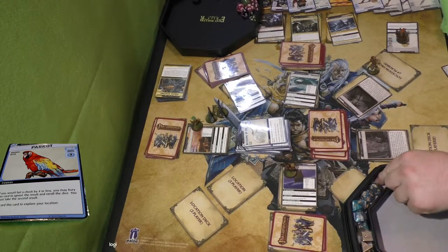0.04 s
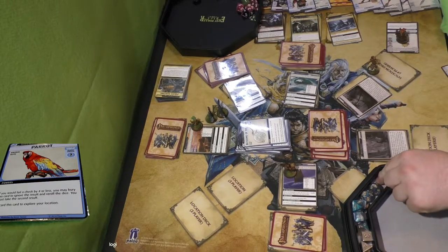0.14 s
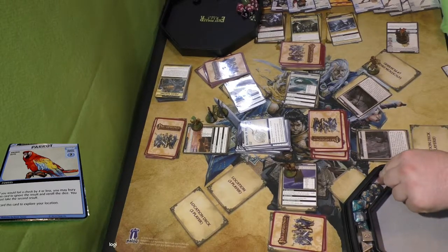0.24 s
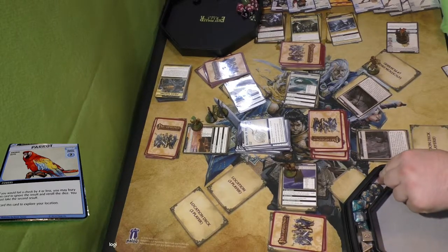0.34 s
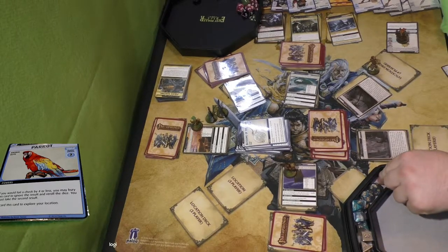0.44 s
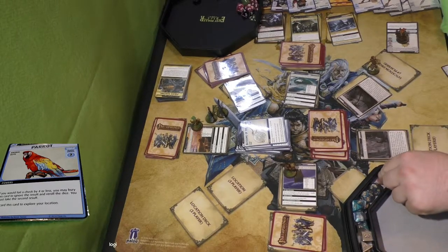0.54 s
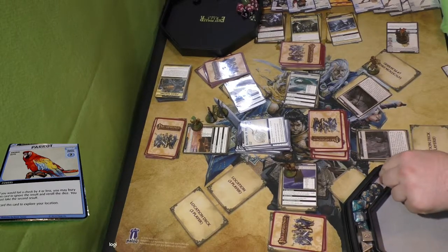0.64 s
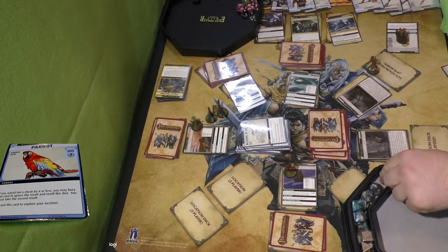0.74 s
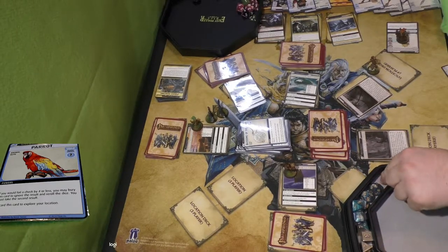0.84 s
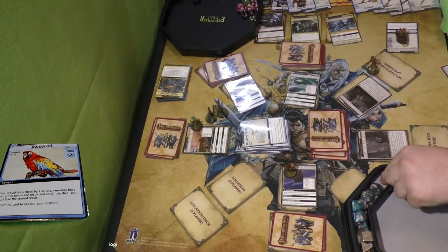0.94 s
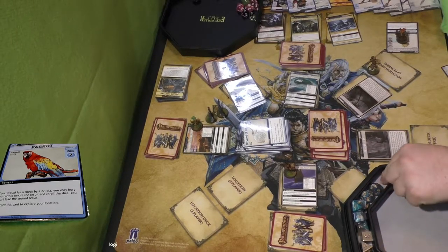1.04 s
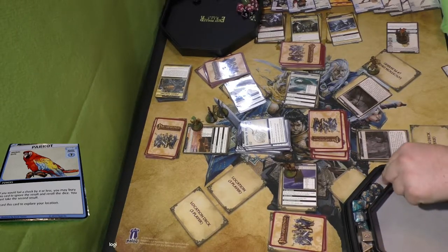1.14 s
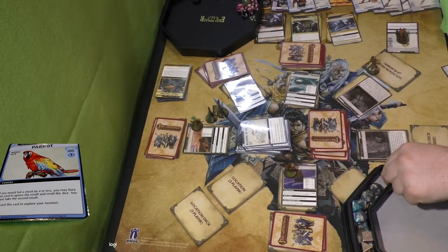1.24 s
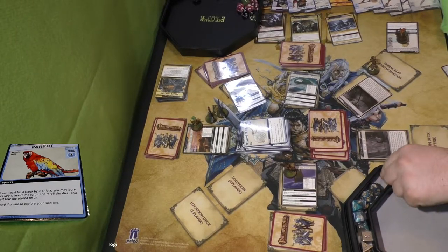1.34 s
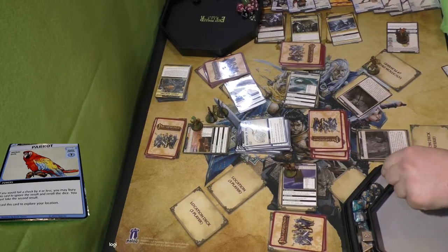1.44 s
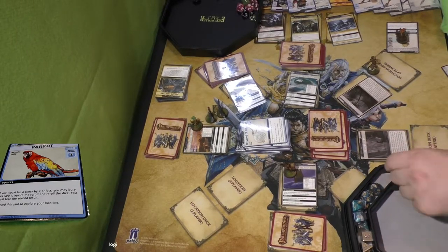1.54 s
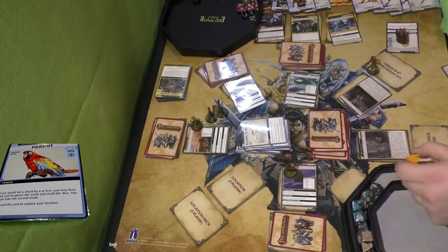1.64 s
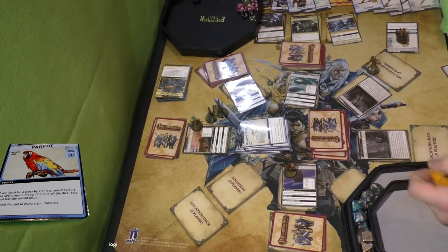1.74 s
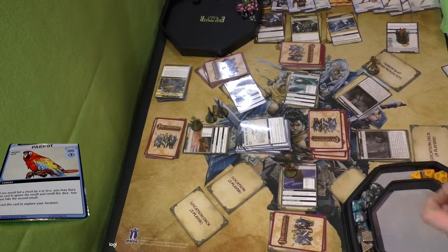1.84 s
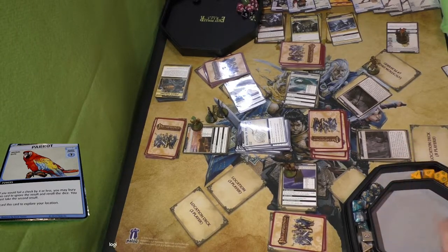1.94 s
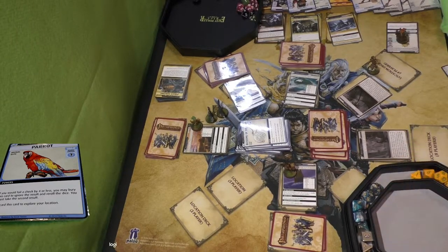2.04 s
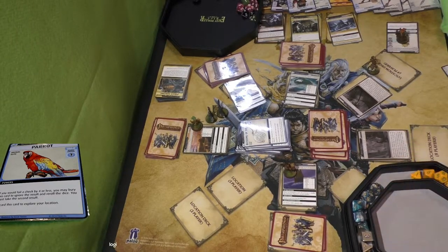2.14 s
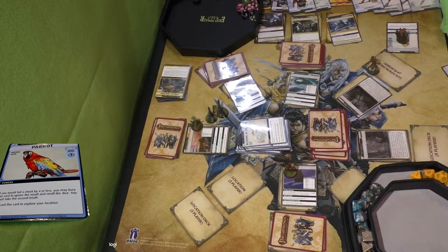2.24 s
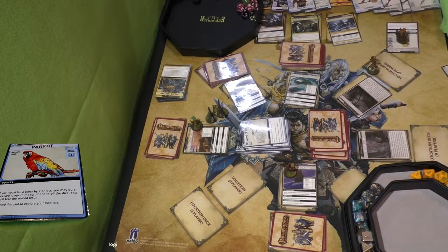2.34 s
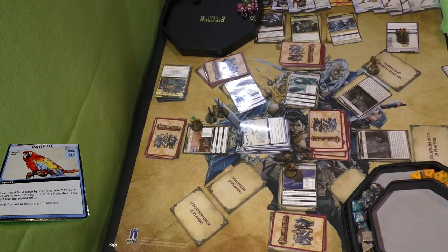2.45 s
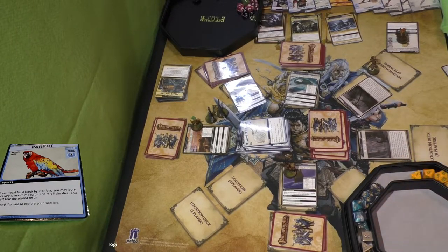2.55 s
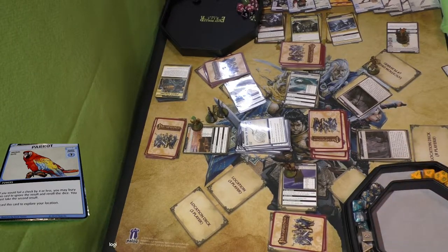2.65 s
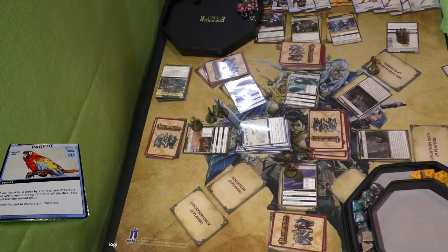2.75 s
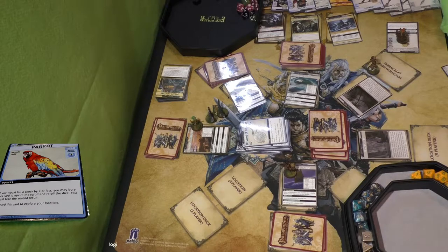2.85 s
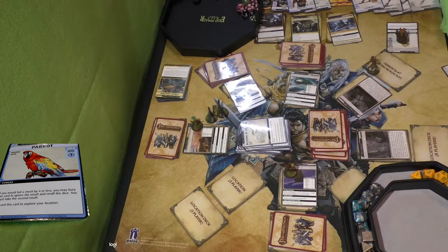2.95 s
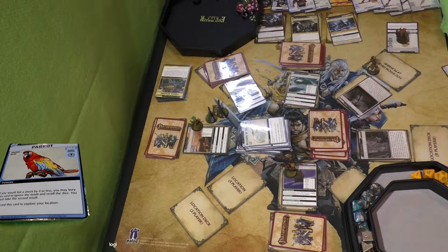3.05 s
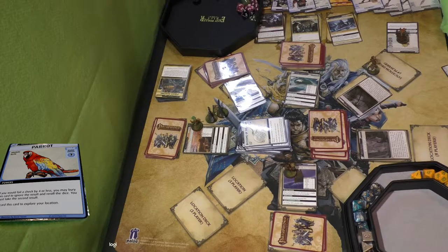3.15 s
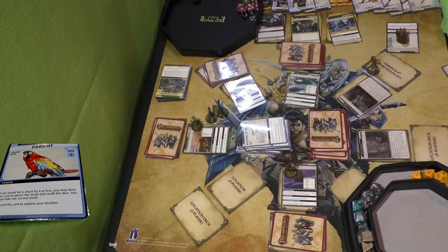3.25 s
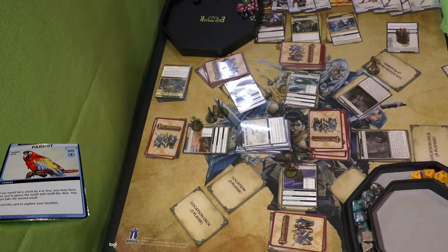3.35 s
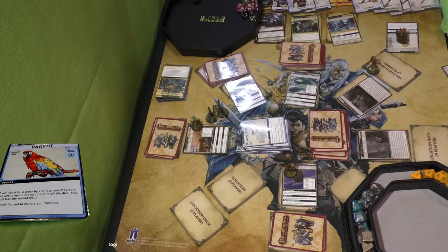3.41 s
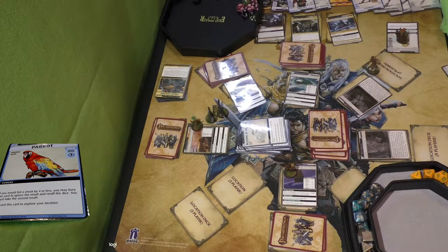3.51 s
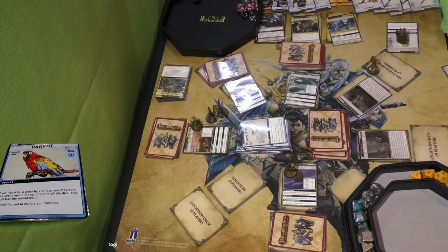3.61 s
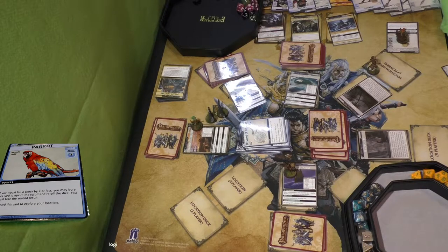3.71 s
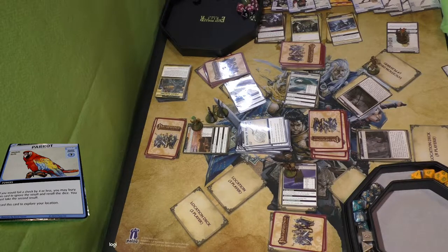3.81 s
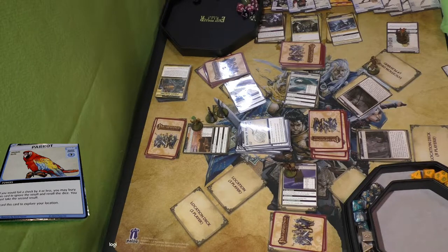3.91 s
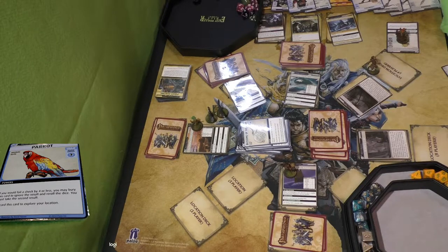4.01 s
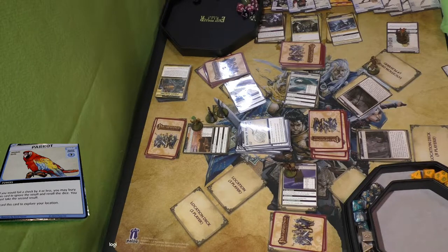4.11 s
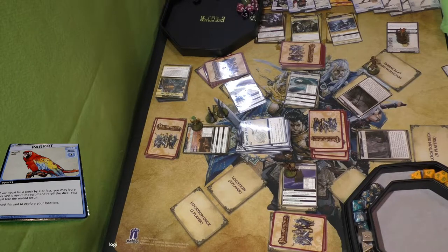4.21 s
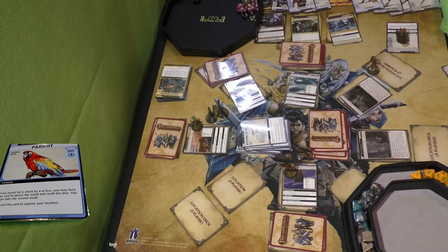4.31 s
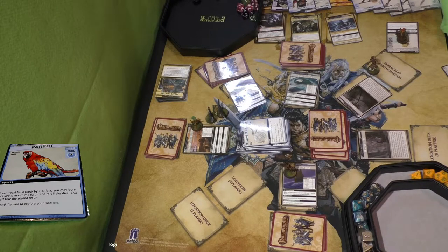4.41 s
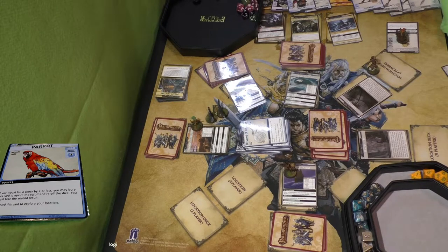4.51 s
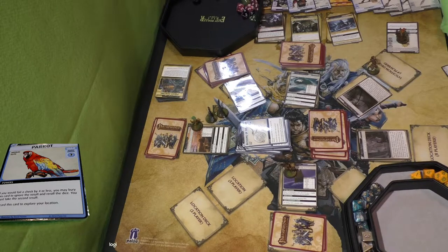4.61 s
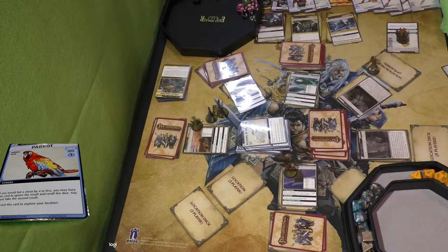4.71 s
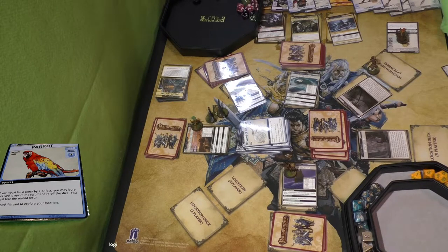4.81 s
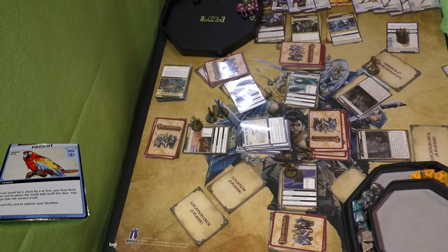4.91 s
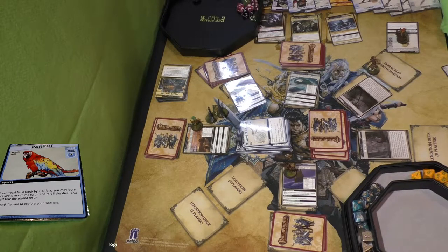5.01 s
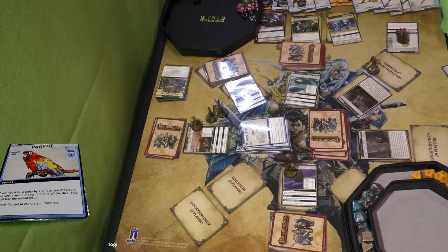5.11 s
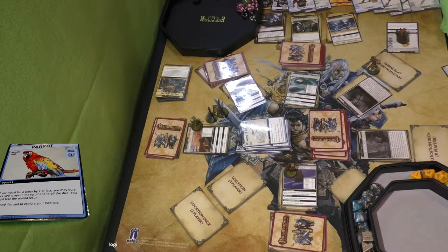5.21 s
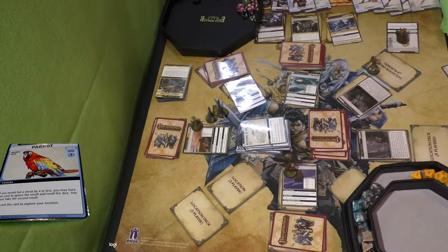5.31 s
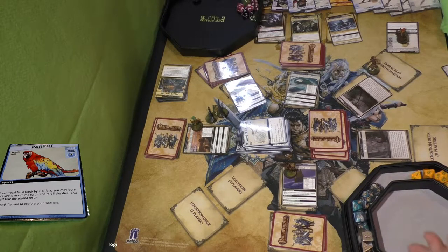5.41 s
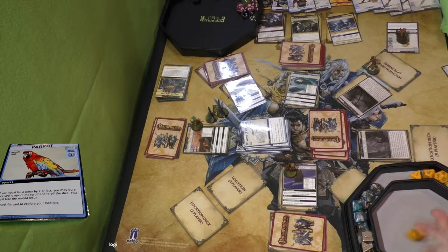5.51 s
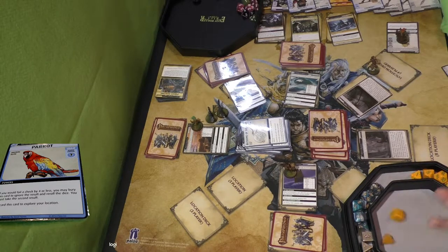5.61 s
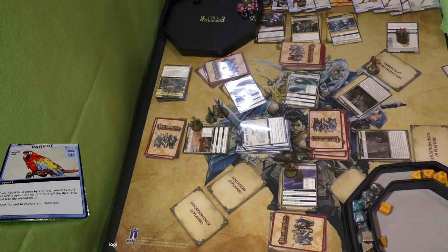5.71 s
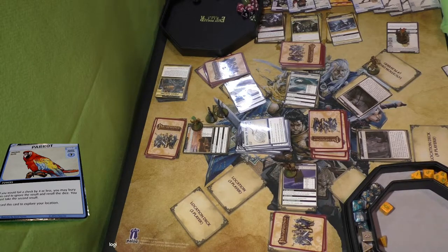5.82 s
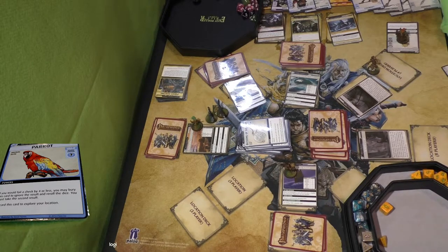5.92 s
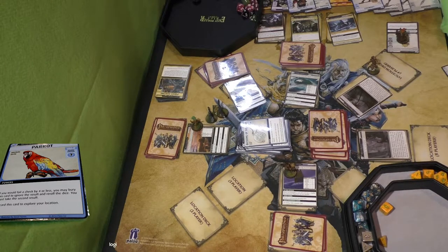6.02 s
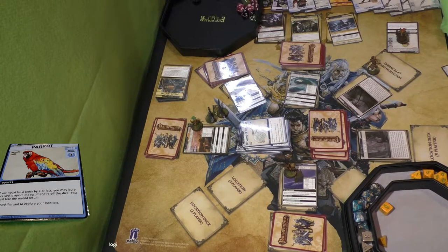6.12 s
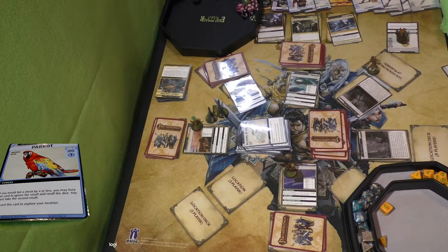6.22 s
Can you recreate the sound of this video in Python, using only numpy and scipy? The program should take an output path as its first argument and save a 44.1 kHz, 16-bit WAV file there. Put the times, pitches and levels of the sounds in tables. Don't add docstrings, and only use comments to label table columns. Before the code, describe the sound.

Close above a table in a small room, with faint mains hum, fingers scrape quietly and nudge plastic dice in their slot. A couple of crisp clacks follow as dice are lifted, then sparse clicks, then about two seconds of dense, bright rattling between cupped hands. It loosens into a few clicks, palms rub apart, and the dice land with a hard padded knock, a brief tumble and soft roll.

```python
import sys
import numpy as np
from scipy import signal
from scipy.io import wavfile
from scipy.ndimage import uniform_filter1d, minimum_filter1d

SR = 44100
rng = np.random.default_rng(int(sys.argv[2]) if len(sys.argv) > 2 else 0)


def boost_factor(decibels):
    exponent = np.asarray(decibels, float) / 20
    return 10 ** exponent


def wav_out(sig):
    wavfile.write(sys.argv[1], SR, np.round(np.clip(np.atleast_2d(sig).T, -1, 1) * 32767).astype(np.int16))


N = 276110

# (time [s], blow level [dB], hardness [dB], floor pitch [Hz])
KNOCKS = [(5.6150, -2.5, 6, 785), (5.6245, -17.5, -11, 1560), (5.6282, -8, -4, 873), (5.6356, -15, -2, 934),
          (5.6782, -22, -21, 900), (5.6972, -20, -9, 920), (5.711, -25, -21, 834), (5.732, -22.5, -34, 927),
          (5.7876, -17, 3, 890), (5.721, -30.5, -17, 1130), (5.752, -26.5, -18, 960),
          (5.7984, -37, -6, 980), (5.685, -25, -15, 900), (5.744, -30, -10, 990), (5.76, -33.5, -18, 925),
          (5.804, -31, -6, 940), (5.812, -35, -12, 950)]


def evened(x):
    return x / np.sqrt(np.mean(x ** 2) + 1e-20)


def read(points, hz):
    f, value = np.transpose(points)
    return np.interp(np.log(hz + 1), np.log(f + 1), value)


def curve(rows):
    s, db = np.transpose(rows)
    return np.interp(np.arange(N) / SR, s, db, left=-200, right=-200)


def add(mix, s, sound):
    part = mix[round(s * SR):][:len(sound)]
    part += sound[:len(part)]


def burst(hz, db, ring_s, turn):
    u = np.arange(900) / SR / ring_s
    swell = (u * np.exp(1 - u)) ** 2
    return boost_factor(db) * swell * np.sin(2 * np.pi * (hz * ring_s * u + turn))


def noise(tone, patchy_db, size=512):
    frames, hz = 4 * N // size + 5, np.fft.rfftfreq(size, 1 / SR)
    a, b, patches = rng.standard_normal((frames, len(hz), 3)).T
    patches = uniform_filter1d(patches, size=8, axis=0)
    patches = evened(uniform_filter1d(patches, size=12, axis=1))
    z = (a + 1j * b) * boost_factor(read(tone, hz)[:, None] + patchy_db * patches)
    return evened(signal.istft(z, nperseg=size, noverlap=3 * size // 4)[1][:N])


def riding():
    # (time [s], level [dB], recovery time [s])
    sags = [
        (1.851, 0, 0.16),
        (3.2, -2.5, .5),
        (4.1, -1.5, 1.),
    ]
    t = np.arange(N) / SR
    gain_db = -1.08 - 0.18 * t
    gain_db += -8 * np.exp(-(t / 0.18) ** 0.69)
    for s, db, back_s in sags:
        step = np.clip((t - s) / .04, 0, 1)
        gain_db += db * step * np.exp(-np.maximum(t - s, 0) / back_s)
    landed = np.maximum(t - KNOCKS[0][0], 0)
    for db, hump_s in [(-15.5, 0.045), (4, 0.12)]:
        u = landed / hump_s
        gain_db += db * u ** 2 * np.exp(1 - u ** 2)
    return gain_db


def hum():
    # (multiple of the mains, level [dB rms])
    overtones = [(1, -47.5), (2, -72), (3, -60.5), (4, -83), (5, -75), (7, -77.5), (9, -80.5), (11, -85),
                 (13, -86), (15, -84.5), (17, -96.5), (19, -96), (21, -89.5), (23, -93.5)]
    # (frequency [Hz], level [dB])
    hiss_tone = [(25, 10), (40, -7.5), (100, -4.5), (150, -5), (300, -9), (600, -19), (1200, -23),
                 (2500, -32), (4000, -39), (8000, -42), (16000, -47)]
    mains_hz, hiss_db = 60.0, -61.5
    turn = 2 * np.pi * mains_hz * np.arange(N) / SR
    tones = np.zeros(N)
    for k, db in overtones:
        tones += np.sqrt(2) * boost_factor(db) * np.cos(k * turn + .75 * max(k - 3, 0))
    return (tones + boost_factor(hiss_db) * noise(hiss_tone, 1.2, size=2048)) * boost_factor(riding())


def earlier_knock():
    # (frequency [Hz], level [dB], time to fall 60 dB [s])
    fading = [(800, -68, 0.16), (1080, -66, 0.14), (1400, -77, 0.17), (2360, -54.5, 0.086),
              (4120, -88, 0.12)]
    out, t = np.zeros(N), np.arange(9000) / SR
    for hz, db, t60 in fading:
        band = signal.butter(2, [.9 * hz, 1.1 * hz], "band", fs=SR, output="sos")
        settled = signal.sosfilt(band, rng.standard_normal(2 * len(t)))[len(t):]
        add(out, 0, boost_factor(db - 60 * t / t60) * evened(settled))
    return out


def hand():
    # (time [s], level [dB])
    scrape = [(0.35, -106), (0.436, -83), (0.926, -88), (0.934, -72), (1.096, -102), (1.264, -83),
              (1.424, -92), (1.512, -77.5), (1.83, -82)]
    scoop = [(2.12, -76.5), (2.314, -78), (2.338, -93), (2.376, -81), (2.464, -81), (2.48, -82)]
    reach = [
        (6.2, -100),
        (6.24, -92.5),
        (6.27, -58),
    ]
    # (time [s], level [dB])
    nail = [(.4, -100), (.48, -87), (.56, -96), (.68, -88), (.85, -104), (.95, -74), (1.03, -100)]
    squeak = [(1.42, -105), (1.568, -80), (1.652, -91), (1.684, -77), (1.7, -84), (1.742, -72), (1.83, -76)]
    # (time [s], level [dB])
    sleeve = [(2.4, -90.5), (2.8, -76.5), (4.1, -68), (4.6, -72), (5.07, -68), (5.11, -55.5), (5.2, -68),
              (5.35, -58.5), (5.6, -67)]
    chatter = [(3.68, -78), (3.75, -53), (3.95, -55.5), (4.12, -59.5), (4.22, -57.5), (4.3, -83)]
    # (time [s], level [dB])
    rub = [(5.15, -86.5), (5.27, -64.5), (5.34, -86.5), (5.45, -51), (5.6, -42), (5.625, -50.5), (5.7, -78),
           (5.82, -67)]
    # (frequency [Hz], level [dB per Hz])
    scrape_tone = [(2000, -4), (3000, 9), (4200, -14), (5900, -7), (8000, -29), (12300, -11), (15000, -9)]
    nail_tone = [(10500, -17), (12400, 7), (13800, -20), (15500, 1), (16500, -17)]
    squeak_tone = [(3800, -5), (4300, -11.5), (5300, -28), (5900, 0), (6400, -15.5), (7500, -21),
                   (9000, -37)]
    sleeve_tone = [(200, -18), (500, -3), (1000, 2.5), (1600, 4.5), (2200, -7.5), (4000, -52)]
    chatter_tone = [(1600, -18.5), (2400, -1), (3200, -6), (4200, -13), (5200, -12.5), (9000, -24)]
    rub_tone = [(1500, -15.5), (2470, -6.5), (2950, -6), (3500, -17), (4580, -24), (5870, -26), (7500, -13),
                (9890, -14.5), (13000, -15), (16000, -23)]
    layers = [(scrape, scrape_tone, 1.5), (nail, nail_tone, 3), (squeak, squeak_tone, 2.5),
              (scoop, scrape_tone, 3), (sleeve, sleeve_tone, 2.5), (chatter, chatter_tone, 3),
              (rub, rub_tone, 1.5), (reach, scrape_tone, 1.5)]
    return sum(noise(tone, patchy_db) * boost_factor(curve(level)) for level, tone, patchy_db in layers)


def fingers(x):
    # (start time [s], frequency [Hz], width [Hz], share taken [0-1])
    gaps = [(0, 3590, 500, 0), (2.4, 4770, 1094, 0.7), (2.65, 4970, 1100, 0.63), (2.77, 4670, 1120, 1),
            (3.19, 4250, 600, 0.55), (3.31, 3730, 800, 0.52), (3.42, 3670, 1090, 0.75),
            (3.71, 4400, 510, 0.24), (3.92, 3520, 500, 0.55), (4.24, 3520, 500, 0.5),
            (4.39, 3550, 1350, 0.96), (4.52, 3370, 1200, 0.9), (4.77, 5150, 600, 0.17),
            (4.855, 4780, 1400, 1), (5.2, 4630, 603, 0.33)]
    out, t = x.copy(), np.arange(N) / SR
    ends = [row[0] for row in gaps[1:]] + [N / SR]
    for (s, hz, width_hz, share), until in zip(gaps, ends):
        held = (t >= s) & (t < until)
        r = np.exp(-np.pi * width_hz / SR)
        turn = np.exp(2j * np.pi * hz * t[held])
        band = turn * signal.lfilter([1 - r], [1, -r], x[held] / turn)
        out[held] -= np.clip(share, 0, 1) * 2 * band.real
    return out


def dice():
    # (time [s], level [dB], frequency [Hz])
    nudges = [
        (0.405, -74, 2600),
        (0.937, -52, 3040),
        (0.944, -70, 3120),
        (1.18, -69, 3000),
        (1.252, -58, 3040),
        (1.52, -60.5, 3170),
    ]
    # (time [s], main ring [dB], main
    # ring [Hz], upper ring [dB], edge rings [dB])
    dice_hits = [(1.8466, -17.5, 5260, -10.5, -11.5), (1.8564, -16.5, 4890, -7, -11),
                 (1.866, -32, 5600, -38, -25), (1.867, -24, 5560, -36, -39), (1.9504, -40, 5300, -59, -46.5),
                 (1.955, -31, 5650, -22.5, -29), (2.4949, -30.5, 6880, -32, -66),
                 (2.506, -20.5, 6840, -23.5, -68), (2.5118, -25, 6600, -29, -66),
                 (2.5153, -25, 6800, -38, -62), (2.5298, -27, 6200, -35, -67), (2.5608, -35, 6300, -48, -76),
                 (2.6262, -27.5, 6900, -47, -53), (2.6298, -29, 7000, -49, -71),
                 (2.6572, -24.5, 7440, -18, -17.5), (2.6789, -30, 7300, -16.5, -21),
                 (2.686, -44, 7040, -29, -37), (2.694, -57, 6920, -49, -46), (2.7782, -25, 6400, -16, -30),
                 (2.7816, -27, 6530, -18, -47), (2.7854, -24.5, 6260, -36, -46),
                 (2.8375, -31, 6370, -35.5, -65), (2.9483, -29, 7400, -22.5, -33),
                 (2.9651, -11.5, 6430, -7, -15.5),
                 (3.2027, -6, 5680, -8, -6), (3.21, -17.5, 7100, -21, -20), (3.2558, -15.5, 6300, -28, -30),
               (3.307, -41, 6240, -57, -55), (3.3197, -11.5, 5360, -17, -16.5),
               (3.325, -20, 5200, -15.5, -23), (3.333, -27, 5600, -23, -31), (3.3453, -30, 5900, -29, -33),
               (3.3573, -17, 5740, -18.5, -23), (3.3644, -21, 6400, -23, -25),
               (3.4243, -23.5, 6070, -28, -23), (3.4316, -14.5, 5540, -32, -13.5),
               (3.436, -10, 5240, -10, -16), (3.4405, -19, 5200, -29, -17), (3.455, -22, 5860, -26, -27),
               (3.4582, -26, 5200, -31, -27), (3.5078, -32, 5350, -39, -52), (3.5104, -24, 5440, -35, -48),
               (3.5124, -31, 5320, -51, -77), (3.5244, -20.5, 5520, -21, -32),
               (3.5271, -16, 5680, -29, -26), (3.607, -12.5, 5420, -26, -37), (3.615, -37, 5600, -24, -48),
               (3.618, -18, 5650, -30, -42),
                 (3.7234, -11.5, 6155, -26.5, -9.5), (3.7327, -36, 6630, -32, -31),
              (3.7907, -13, 5920, -19, -18.5), (3.8231, -18, 5480, -22.5, -24),
              (3.8324, -35.5, 6590, -30, -28), (3.8681, -13.5, 6080, -11.5, -14.5),
              (3.8713, -17, 6100, -20.5, -25.5), (3.9332, -22.5, 5650, -36.5, -48.5),
              (3.9433, -20.5, 5340, -27, -48.5), (3.9507, -28.5, 5310, -43, -43.5),
              (3.9621, -28.5, 5520, -45, -57.5), (3.9892, -16, 6110, -19, -7.5),
              (3.9956, -30, 7430, -16.5, -30), (3.9983, -35.5, 6880, -21, -22.5),
              (4.0009, -34, 6670, -21.5, -33), (4.0061, -38.5, 7124, -25, -24.5),
              (4.0244, -20.5, 6200, -7.5, -10.5), (4.0324, -19, 4550, -13, -26.5),
              (4.0413, -25, 5140, -22, -30.5), (4.0477, -44, 5670, -31.5, -32),
                 (4.09, -6.5, 5910, -12, -5), (4.0957, -22, 5800, -30, -25), (4.1072, -46, 5270, -29, -31),
              (4.124, -24, 5500, -30, -34), (4.1394, -15.5, 5550, -30, -44), (4.1504, -41, 6160, -33, -36),
              (4.17, -9.5, 6450, -31, -18), (4.241, -49, 5290, -52, -44), (4.2493, -5, 5520, -16, -22.5),
              (4.26, -32, 5760, -36, -41), (4.268, -25, 5800, -40, -56), (4.275, -28, 5800, -49, -49),
              (4.2897, -14, 6100, -27, -17), (4.3085, -11.5, 6130, -33, -17),
              (4.312, -21, 6300, -25.5, -16.5), (4.402, -11, 5600, -41, -19.5),
              (4.4124, -5, 5670, -16.5, -13), (4.428, -42, 5460, -41, -21), (4.4489, -10, 5800, -19, -8.5),
              (4.4549, -12, 6300, -15, -19), (4.4644, -27, 6180, -22, -32), (4.4726, -37, 6140, -36, -39.5),
                 (4.529, -15.5, 5630, -20, -30), (4.543, -35.5, 6340, -46, -58),
                (4.5689, -11, 5100, -23.5, -22), (4.5768, -19, 4840, -43, -32),
                (4.584, -30, 5230, -47, -53), (4.61, -17.5, 5120, -26.5, -26),
                (4.6245, -29.5, 6060, -50, -36), (4.629, -28, 6160, -54, -47),
                (4.785, -11.5, 6900, -20, -16.5), (4.794, -44, 6870, -23.5, -36),
                (4.8023, -24, 7100, -26, -27.5), (4.8273, -30, 7100, -27, -35),
                (4.853, -41, 7140, -47, -44), (4.863, -17.5, 6600, -27, -28),
                (4.866, -19, 6630, -25.5, -41), (4.8748, -42, 6550, -30, -50),
                (4.9755, -29.5, 6960, -51, -68.5),
                 (5.2756, -20, 5870, -36.5, -78), (5.289, -37.5, 6330, -34.5, -36.5),
              (5.2973, -47, 5270, -55.5, -35), (5.3095, -36, 5440, -54, -28.5),
              (5.314, -44.5, 5900, -54, -41.5), (5.3535, -11.5, 5860, -21, -27.5),
              (5.3686, -34, 5495, -42, -55), (5.3777, -16.5, 5675, -26.5, -22.5),
              (5.406, -34, 5740, -41, -33.5), (5.4166, -35.5, 5906, -36.5, -28),
              (5.4322, -26.5, 5480, -20.5, -26), (5.525, -31, 4940, -32, -41)]
    # (start time [s], upper ring [Hz], edge ring [Hz], low hollow [dB], high hollow [dB])
    holds = [(1.84, 8350, 11700, -25.5, -22), (2.49, 8470, 10940, -40, -4), (2.62, 7740, 10600, -39, -10.5),
             (2.65, 8300, 11400, -50, -16), (2.77, 7800, 10800, -42, -12.5), (2.94, 8370, 11500, -52, -15),
             (3.2, 9230, 11200, -15.5, -32), (3.25, 7700, 12000, -14, -17), (3.315, 7940, 12400, -14, -24),
             (3.35, 9200, 12300, -23, -29), (3.42, 8340, 12000, -24, -34), (3.5, 8200, 11600, -23.5, -38),
             (3.6, 7800, 12300, -16.5, -35.5), (3.72, 8200, 12850, -26.5, -18.5),
             (3.785, 8500, 11100, -25.5, -22.5), (3.82, 8600, 11900, -29.5, -18),
             (3.865, 8300, 12600, -22, -25), (3.93, 8050, 12400, -34, -14.5),
             (3.985, 8100, 11000, -18, -24), (4.02, 8800, 11500, -21, -5), (4.085, 7950, 11570, -15.5, -40),
             (4.165, 8100, 13200, -16.5, -7), (4.245, 8540, 10800, -15.5, -21),
             (4.285, 8400, 11700, -23, -24), (4.398, 8400, 12000, -14, -47.5), (4.445, 8650, 12500, -19, 2),
             (4.525, 7900, 11100, -22, -11), (4.565, 8130, 11940, -19.5, -33),
             (4.605, 7540, 11100, -19, -10.5), (4.78, 9400, 12650, -22, -13), (4.86, 8660, 12750, -32, -14),
             (4.97, 7700, 12700, -14.5, 1.5), (5.27, 8000, 13730, -11.5, -21.5),
             (5.305, 8600, 13700, -12, -14), (5.35, 9270, 11300, -14.5, -28),
             (5.4, 9000, 10800, -26.5, -15.5)]
    # (frequency [Hz], pitch spread [share], ring time [s])
    hollow = [(2530, 0.17, 0.0005), (3823, 0.17, 0.00055)]
    main_ring_s, face_ring_s = 0.0003, 0.00026
    face_shift, face_spread_db = 0.09, 4
    blurs = [1, 1, 0.96, 0.44, 0.44, 0.44]
    out, wide = np.zeros(N), np.zeros(N)
    clacks = dice_hits
    luck = rng.uniform(-1.156, 1, (len(clacks), 6, 3))
    for (s, main_db, main_hz, upper_db, edge_db), chance in zip(clacks, luck):
        begun = [holds[0]] + [row for row in holds if row[0] < s]
        _, upper_hz, edge_hz, low_db, high_db = max(begun, key=lambda row: row[0])
        top_db = max(main_db, upper_db, edge_db)
        add(out, s, burst(7700, (top_db + edge_db) / 2 - 9.5, .00008, 0))
        add(out, s, burst(14980, edge_db - 11.5, .00016, 0))
        levels = [top_db + low_db, top_db + high_db, main_db, upper_db, edge_db, edge_db - 6.5]
        rings = hollow + [(main_hz, 0, main_ring_s), (upper_hz, face_shift, face_ring_s),
                          (edge_hz, face_shift, face_ring_s), (edge_hz * 0.99, face_shift, face_ring_s)]
        for db, blur, (hz, spread, ring_s), (shift, turn, face) in zip(levels, blurs, rings, chance):
            pitch_hz = hz * (1 + spread * shift)
            ring_db = db + face_spread_db * face
            add(out, s, burst(pitch_hz, ring_db, ring_s, turn))
            add(wide, s, burst(pitch_hz, ring_db, ring_s * blur, turn) / np.sqrt(blur))
    out, wide = fingers(fingers(out)), fingers(fingers(wide))
    for s, db, hz in nudges:
        add(out, s, burst(hz, db, 0.0012, 0))
        add(wide, s, burst(hz, db, 0.0018, 0))
    ahead = rng.standard_normal(240) * np.linspace(0, 1, 240)
    ahead /= np.linalg.norm(ahead)
    out[:-260] += boost_factor(-15.5) * signal.oaconvolve(out, ahead)[260:N]
    small = signal.butter(5, 2050, "high", fs=SR, output="sos")
    return signal.sosfilt(small, [out, wide])


def tray():
    # (frequency [Hz], level [dB], ring time [s])
    rim = [(1360, -14, 0.0014), (2092, -8.5, 0.00056), (2910, -16, 0.00075), (4640, -27, 0.00076)]
    # (time [s], level [dB], frequency [Hz])
    ticks = [(5.616, -33.5, 7240), (5.631, -27.5, 6700), (5.6324, -33, 9800), (5.6255, -21, 2480),
             (5.635, -30.5, 2493), (5.798, -27, 2300), (5.801, -34, 3440), (5.811, -40, 2610)]
    out = np.zeros(N)
    for s, blow_db, hard_db, hz in KNOCKS:
        add(out, s, burst(hz, blow_db, 0.0018, 0))
        for f, db, ring_s in rim:
            add(out, s + 0.00075, burst(f, blow_db + hard_db + db, ring_s, 0))
    for s, db, hz in ticks:
        add(out, s, burst(hz, db, 0.00081, 0))
    return out


def rolling():
    # (time [s], level [dB])
    roll = [(5.62, -64), (5.64, -29), (5.66, -44), (5.68, -36), (5.755, -39), (5.778, -40.5), (5.8, -38),
            (5.86, -49.5), (5.95, -63), (6.12, -95)]
    # (frequency [Hz], level [dB])
    roll_tone = [(400, -29), (650, -13.5), (900, -3), (1120, -7), (1400, -6.5), (2500, -15.5),
                 (4000, -30.5), (5900, -56), (7000, -42.5), (11000, -61.5)]
    bumps = evened(signal.oaconvolve(rng.standard_normal(N), np.hanning(500), "same"))
    return noise(roll_tone, 1.5) * boost_factor(1.5 * bumps) * boost_factor(curve(roll))


def tail(wet_db, near_db):
    # (frequency [Hz], level [dB])
    wall_tone = [(1000, 4.5), (2400, 6), (3800, 2.5), (5800, -5.5), (8500, 1), (12000, -5), (15300, 3.5),
                 (16100, -27)]
    # (frequency [Hz], time to fall 60 dB [s])
    wall_t60 = [(500, 0.43), (1500, 0.29), (4000, 0.42), (8000, 0.42), (12000, 0.38), (15000, 0.72)]
    rise_s, scatter_t60_s = .014, .12
    taps = np.zeros(SR // 2)
    at = np.arange(200, len(taps) - 20, 20)
    taps[at + rng.integers(0, 20, len(at))] = rng.choice([-1., 1.], len(at))
    hz, t, z = signal.stft(taps, SR, nperseg=128)
    cut_db = -7 * np.minimum(hz / 3000, 1)[:, None] * (t / 0.54) ** 3
    fade_db = read(wall_tone, hz)[:, None] - 60 * t / read(wall_t60, hz)[:, None]
    z = z * boost_factor(cut_db + fade_db) * np.minimum(t / rise_s, 1)
    late = signal.istft(z, SR, nperseg=128)[1]
    late *= boost_factor(wet_db) / np.linalg.norm(late)
    since = np.arange(4000) / SR
    scatter = rng.standard_normal(4000) * boost_factor(-60 * since / scatter_t60_s) * np.minimum(since / rise_s, 1)
    add(late, .001, boost_factor(near_db) * scatter / np.linalg.norm(scatter))
    return late


def room(x, sent, wet_db, near_db, echo_db):
    # (delay [s], level [dB])
    surfaces = [
        (.0008, -14.5),
        (.0014, -3.5),
        (.002, -6),
        (0.0107, -10.5),
    ]
    swap_s = .085
    echoes = np.zeros(800)
    for s, db in surfaces:
        add(echoes, s, boost_factor(echo_db + db) * np.hanning(7) / 3)
    path = (np.arange(N) / SR / swap_s).astype(int) % 3
    late = sum(signal.fftconvolve(sent * (path == k), tail(wet_db, near_db))[:N] for k in range(3))
    return x + signal.oaconvolve(x, echoes)[:N] + late


def scene():
    background = hum()
    landing = earlier_knock() + tray() + rolling()
    thrown = room(landing, landing, -22.5, -15, -34)
    mono = background + thrown + hand() + room(*dice(), -13.5, -11.5, -4)
    return np.array([mono, mono])


def starved(x, under_db):
    hz, t, z = signal.stft(x, SR, nperseg=256)
    power = uniform_filter1d(abs(z[:128]) ** 2, size=2, axis=1)
    bands = power.reshape(32, 4, -1).mean(1)
    loudest = -minimum_filter1d(-bands[3:].max(0), size=9)
    keep = bands > loudest * boost_factor(-2 * under_db)
    keep[:4] = True
    z[:128] *= np.repeat(keep, 4, axis=0)
    return signal.istft(z, SR, nperseg=256)[1][:N]


def scrambled(x):
    # (frequency [Hz], level [dB])
    side_tone = [(200, -60), (330, -50), (450, -31), (700, -29), (1300, -40), (2500, -26), (12000, -21)]
    hz, t, z = signal.stft(x, SR, nperseg=256)
    z = z * np.exp(2j * np.pi * rng.random(z.shape)) * boost_factor(read(side_tone, hz))[:, None]
    return signal.istft(z, SR, nperseg=256)[1][:N]


def top_cut(x):
    return signal.sosfilt(signal.butter(12, 16970, fs=SR, output="sos"), x)


def record(dry):
    ceiling = .93
    limited = ceiling * np.tanh(abs(dry[0] / ceiling) ** 6) ** (1 / 6) * np.sign(dry[0])
    edged = signal.oaconvolve(limited, signal.firwin(127, 16250, fs=SR), "same")
    edged = starved(edged, 39)
    side = scrambled(edged)
    return top_cut(np.array([edged + side, edged - side]))


dry = scene()
out = record(dry)
wav_out(out)
```